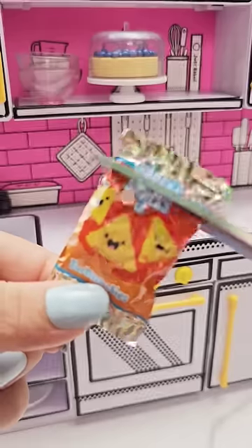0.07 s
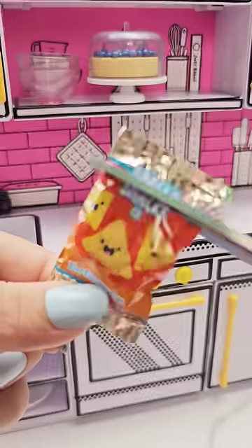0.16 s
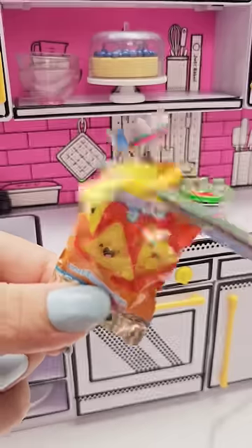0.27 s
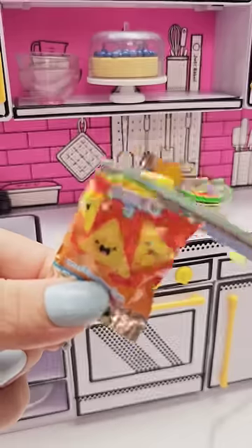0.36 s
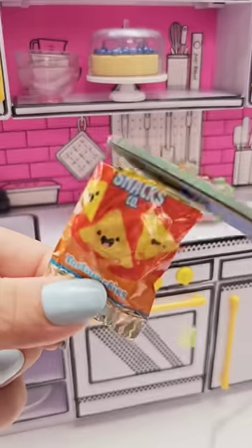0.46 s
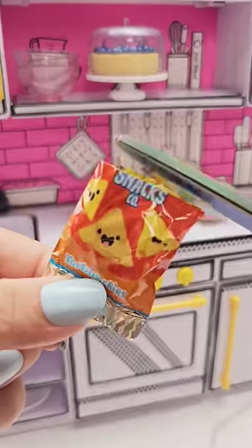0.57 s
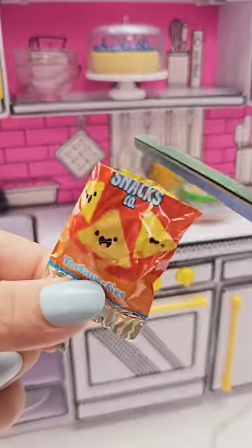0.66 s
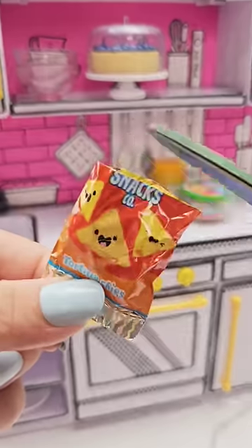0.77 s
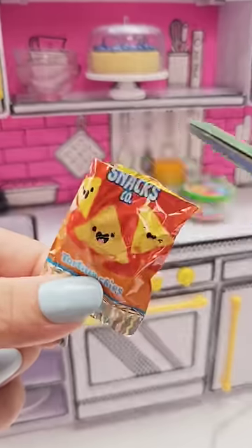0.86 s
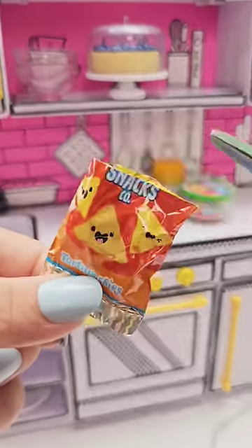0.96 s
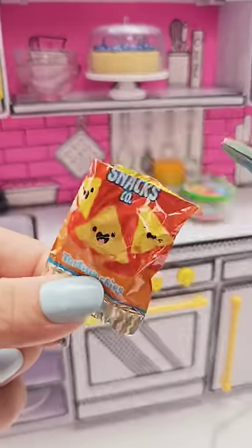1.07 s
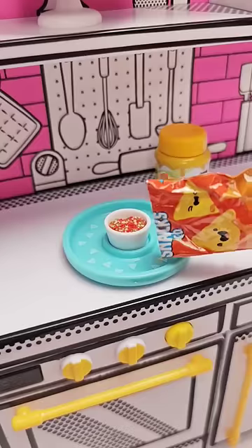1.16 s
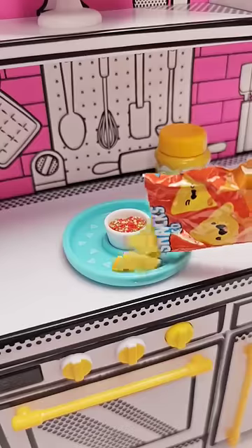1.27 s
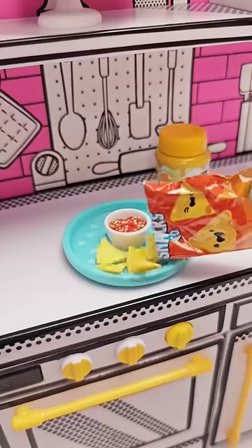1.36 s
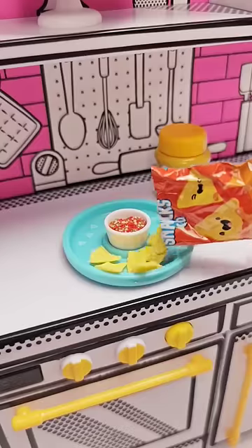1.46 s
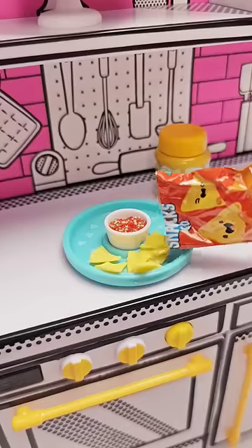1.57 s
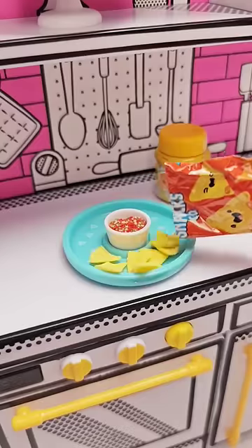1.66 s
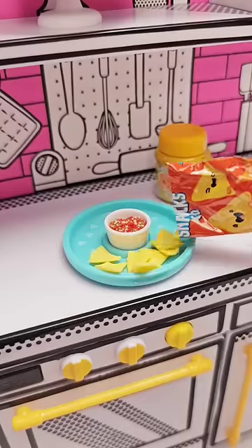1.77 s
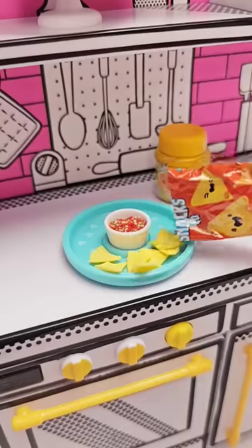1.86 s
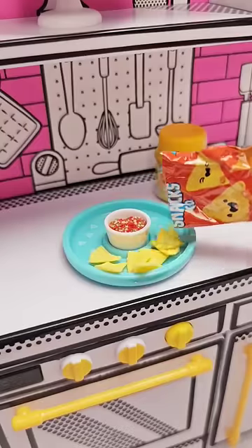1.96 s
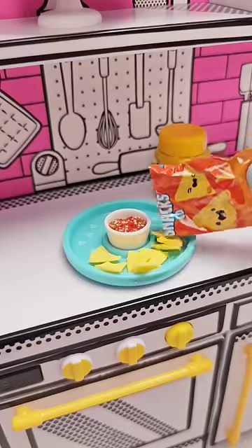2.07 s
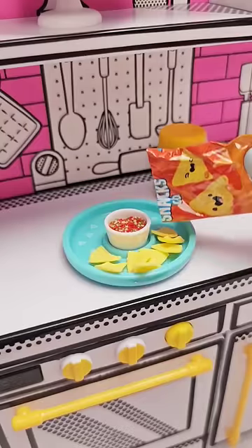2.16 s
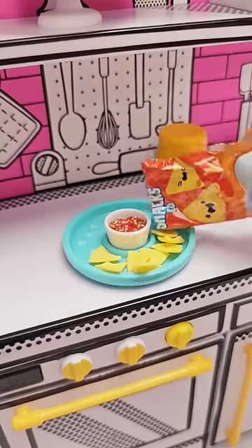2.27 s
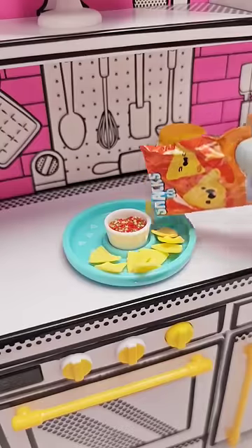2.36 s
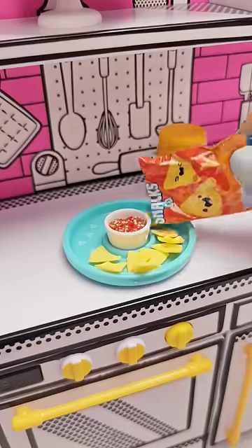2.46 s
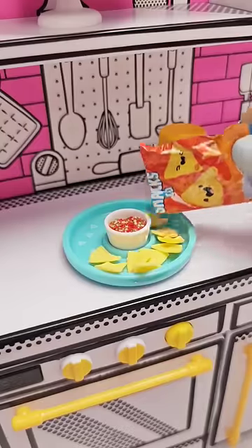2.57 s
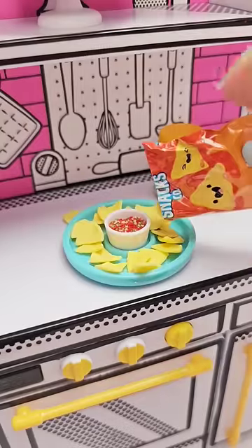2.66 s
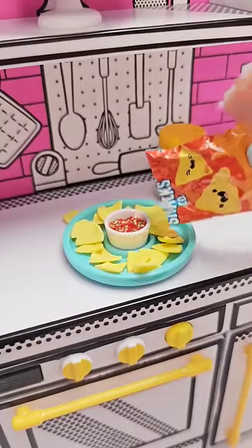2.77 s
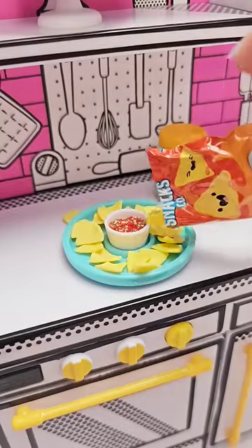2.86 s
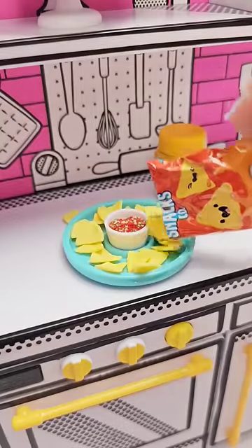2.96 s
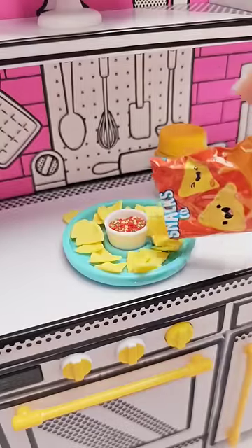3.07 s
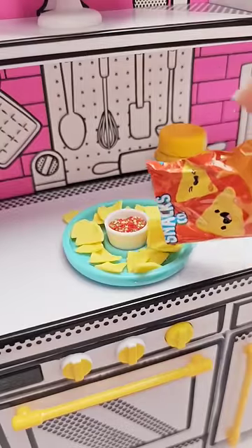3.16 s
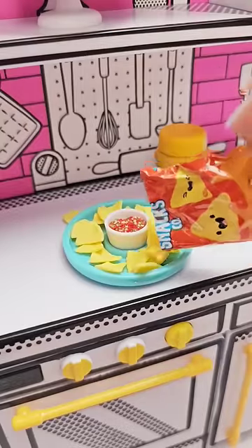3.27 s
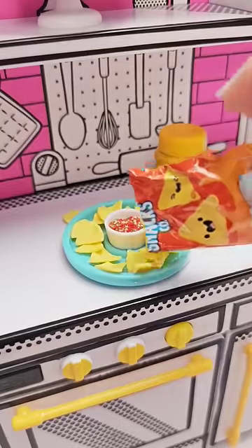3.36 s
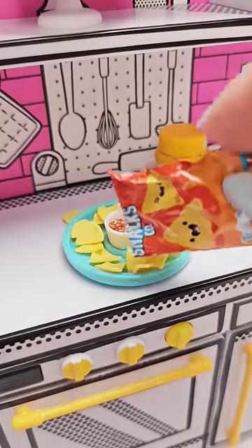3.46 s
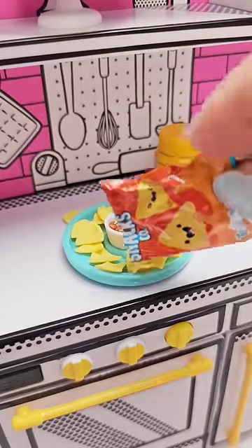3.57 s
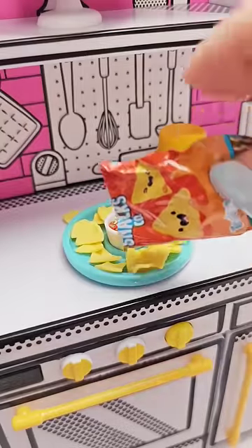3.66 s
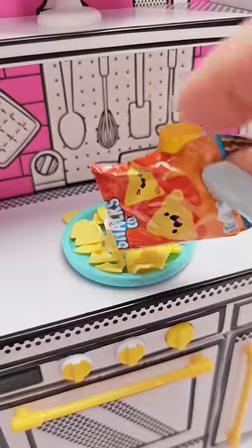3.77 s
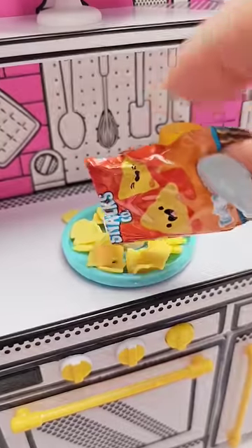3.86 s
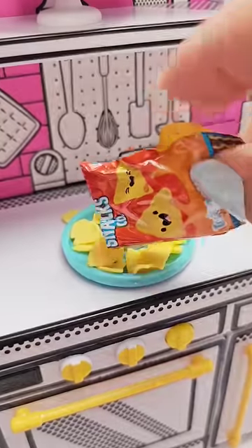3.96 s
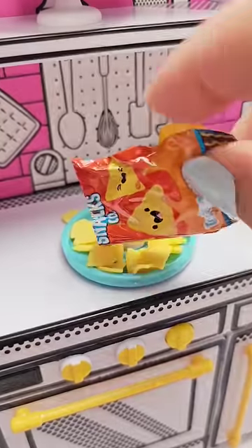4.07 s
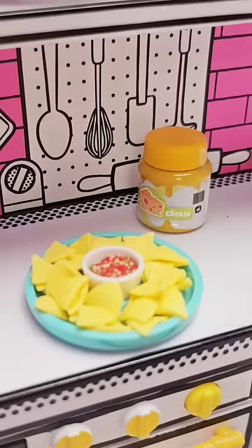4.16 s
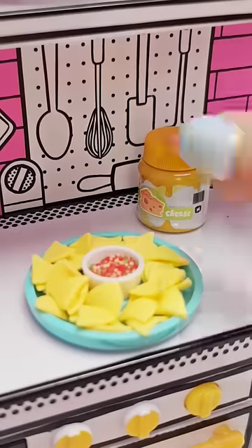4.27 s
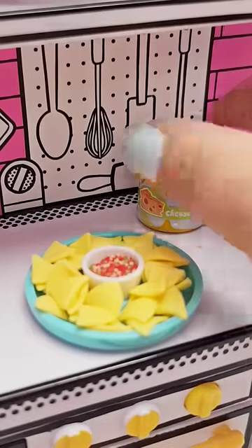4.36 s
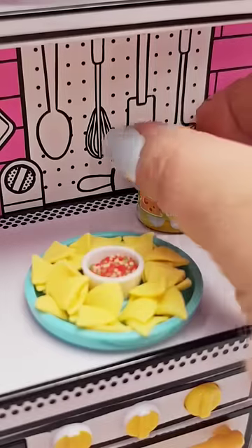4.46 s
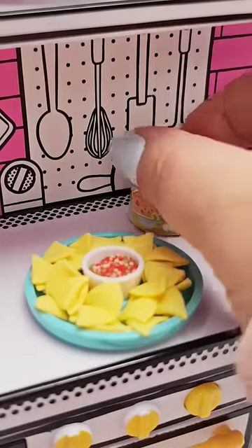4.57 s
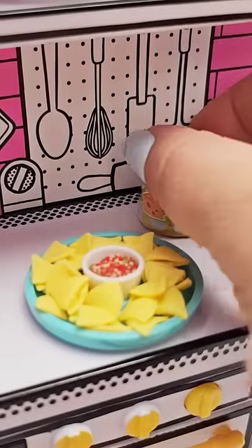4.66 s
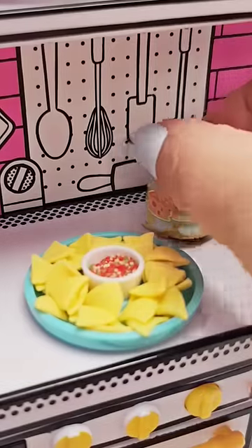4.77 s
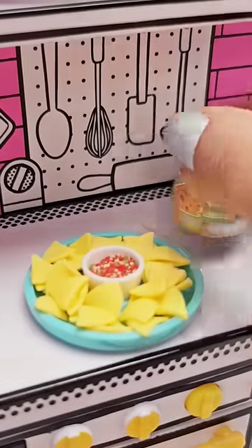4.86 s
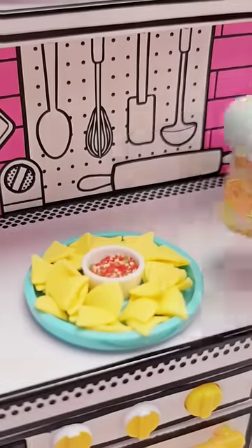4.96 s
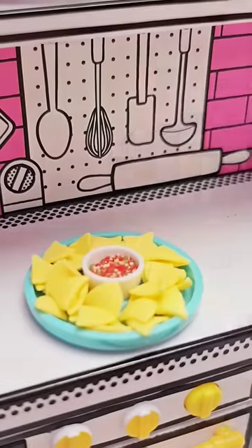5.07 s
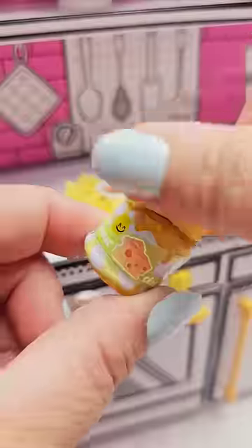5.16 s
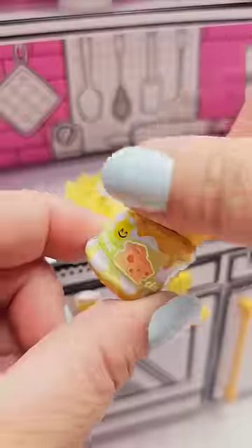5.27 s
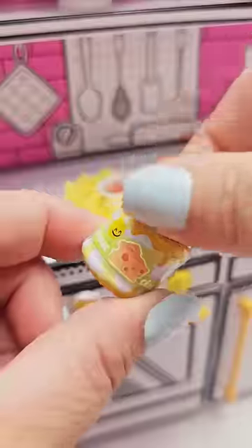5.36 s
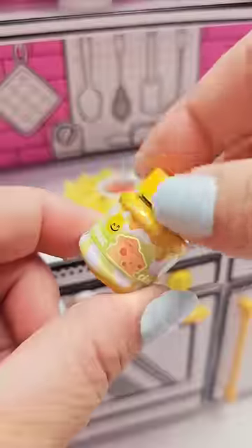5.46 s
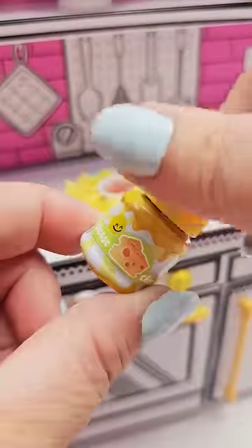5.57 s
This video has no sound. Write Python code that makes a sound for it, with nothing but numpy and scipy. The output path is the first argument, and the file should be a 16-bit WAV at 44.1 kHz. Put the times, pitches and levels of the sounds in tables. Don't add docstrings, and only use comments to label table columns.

```python
import sys
import numpy as np
from scipy import signal
from scipy.fft import rfft, irfft
from scipy.io import wavfile
from scipy.ndimage import uniform_filter1d, minimum_filter1d

SR = 44100
rng = np.random.default_rng(int(sys.argv[2]) if len(sys.argv) > 2 else 0)


def decibels_to_gain(level_db):
    exponent = np.asarray(level_db, float) / 20
    return 10 ** exponent


def wav_out(sig):
    wavfile.write(sys.argv[1], SR, np.round(np.clip(np.atleast_2d(sig).T, -1, 1) * 32767).astype(np.int16))


N = 246959


def unit(x):
    return x / np.sqrt(np.mean(x ** 2) + 1e-20)


def along(points, hz):
    point_hz, point_db = np.transpose(points)
    return np.interp(np.log(hz + 1), np.log(point_hz + 1), point_db)


def colour(x, gain):
    n = x.shape[-1]
    return unit(irfft(rfft(x) * gain(np.fft.rfftfreq(n, 1 / SR)), n))


def ports(n, alike):
    both, left, right = rng.standard_normal((3, n))
    alike = np.clip(alike, 0, 1)
    return np.sqrt(alike) * both + np.sqrt(1 - alike) * np.array([left, right])


def track(spans, column):
    t = np.arange(N) / SR
    gain = 0
    for rows in spans:
        rows = np.array(rows)
        gain = gain + decibels_to_gain(np.interp(t, rows[:, 0], rows[:, column], -200, -200))
    return gain


def grit(n, rate, spread_db, life):
    kicks = (rng.random(n) < rate / SR) * decibels_to_gain(spread_db * rng.exponential(size=n))
    decay = np.exp(-1 / (life * SR))
    return unit(signal.lfilter([1], [1, -decay], kicks) + 0.4)


def steady(noise, envelope):
    x = noise * envelope
    return x * np.sqrt(np.sum(envelope ** 2) / np.sum(x ** 2, axis=1, keepdims=True))


def add(out, start, x):
    out[:, round(start * SR):][:, :x.shape[1]] += x


def stiff(x):
    return signal.sosfilt(signal.butter(3, 190, "high", fs=SR, output="sos"), x)


def ringing(modes, start, attack):
    t = np.maximum(np.arange(N) / SR - start, 0)
    ring = 0
    for hz, db, t60 in modes:
        ring = ring + decibels_to_gain(db - 60 * t / t60) * np.sin(2 * np.pi * hz * t)
    return ring * (1 - np.exp(-t / attack))


# (frequency [Hz], density [dB per Hz])
ROOM_SPECTRUM = [(20, -13.5), (50, -18), (91, -12), (120, -3), (160, -9), (205, -14.5), (331, -20.5),
                 (450, -24), (900, -28.5), (2100, -34.5), (2600, -29.5), (4500, -33)]
# (frequency [Hz], density [dB per Hz])
MIC_HISS = [(6500, -45), (7500, -44), (10600, -64.5), (10900, -39.5), (15400, -47.5), (15700, -62.5)]
# (frequency [Hz], left-right likeness [0-1])
PORT_COHERENCE = [(60, 0.85), (130, 0.79), (290, 0.27), (640, 0.018)]
# (time [s], level [dB])
ROOM_LEVEL = [
    (0.0, -71.5),
    (4.18, -69),
    (5.6, -71.5),
]


def room():
    def level(f):
        return decibels_to_gain(along(ROOM_SPECTRUM + MIC_HISS, f))

    def split(f):
        angle = np.arccos(np.clip(along(PORT_COHERENCE, f), -1, 1)) / 2
        return np.array([np.cos(angle), np.sin(angle)])

    noise = rng.standard_normal((2, N))
    common, opposed = colour(noise, lambda f: level(f) * split(f))
    return decibels_to_gain(-1.0) * track([ROOM_LEVEL], column=1) * np.array([common + opposed, common - opposed])


# (frequency [Hz], level [dB], t60 [s])
JAR_MODES = [(279, -35, 0.093), (452, -32.5, 0.096), (510, -22, 0.0179), (1147, -36.5, 0.027)]
# (time [s], hiss [dB], rattle [dB])
JAR_SCRAPE = [
    (4.552, -88, -70),
    (4.575, -50.5, -61.5),
    (4.592, -57.5, -36.5),
    (4.604, -104, -53),
    (4.645, -77, -64),
    (4.68, -66.5, -52.5),
    (4.745, -85, -101),
]
# (time [s], hiss [dB])
LID_RUBS = [
    (5.35, -95),
    (5.381, -86.5),
    (5.425, -101),
    (5.468, -81),
    (5.49, -99),
]
# (frequency [Hz], density [dB per Hz])
SKIN_FRICTION = [(3000, -23), (8000, -2), (10500, -7), (13500, -1.5), (15500, -13), (16300, -40.5)]
# (frequency [Hz], density [dB per Hz])
TOP_RATTLE = [(180, -39), (300, -5), (500, 5), (750, -7.5), (1200, -18), (2000, -37.5)]


def jar():
    friction = colour(ports(N, 0.082), lambda f: decibels_to_gain(along(SKIN_FRICTION, f)))
    hiss = track([JAR_SCRAPE, LID_RUBS], column=1) * friction
    rattle = track([JAR_SCRAPE], column=2) * colour(ports(N, 1.0), lambda f: decibels_to_gain(along(TOP_RATTLE, f)))
    return hiss + rattle + stiff(ringing(JAR_MODES, start=4.5905, attack=0.0008))


# (time [s], pitch [Hz], level [dB], t60 [s])
HANDLE_KNOCKS = [
    (0.153, 310, -38, 0.022),
    (.211, 325, -55, 0.056),
    (.238, 258.8, -55.5, 0.069),
    (0.406, 298, -51.5, 0.092),
    (.211, 765, -49.5, 0.033),
    (.327, 786, -33.5, 0.036),
    (.374, 810, -60, .04),
    (.798, 484, -51, 0.027),
    (0.805, 419, -54, .03),
    (.818, 313, -53.5, 0.021),
]


def scissors():
    thump_modes = [(175.0, -38.5, 0.074), (470, -45, 0.06), (250, -50, 0.24), (69.0, -57.5, 0.23),
                   (794, -37.5, 0.04)]
    sound = ringing(thump_modes, start=0.2885, attack=0.00041)
    for s, hz, db, t60 in HANDLE_KNOCKS:
        sound = sound + ringing([(hz, db, t60)], start=s, attack=0.001)
    return sound


# (frequency [Hz], level [dB], t60 [s])
TOP_MODES = [(300.3, -10, 0.14), (416, -7, 0.064), (580, -4, 0.054), (762, -25.5, 0.28),
             (940, -11.5, 0.047)]
# (time [s], peak [dB], strongest frequency [Hz])
POURED_CHIPS = [(1.0621, -57, 531), (1.2179, -44.5, 770), (1.2459, -37, 620), (1.3044, -35, 603),
                (1.3146, -35.5, 500), (1.3234, -26, 665), (1.3516, -32.5, 573), (1.3664, -37, 604),
                (1.3827, -38, 640), (1.4458, -32.5, 362), (1.4721, -35, 357), (1.5431, -33, 618),
                (1.5879, -34.5, 643), (1.697, -32, 540), (1.7342, -41.5, 540), (1.7495, -40, 648),
                (1.646, -54.5, 580)]
# (time [s], peak [dB], strongest frequency [Hz])
LATE_CHIPS = [(1.872, -51.5, 640), (1.9072, -44, 536), (1.9211, -43, 720), (2.124, -30, 492),
              (2.17, -51, 560), (1.98, -58, 600), (2.02, -57.5, 520), (2.142, -37.5, 696),
              (2.2, -61.5, 540), (2.222, -55, 1010), (2.456, -47, 475), (2.3224, -32.5, 490),
              (2.396, -31, 370), (2.41, -36.5, 351), (2.4814, -33.5, 356), (2.5156, -34, 366),
              (2.6875, -31, 334), (2.8104, -34.5, 580), (2.92, -41, 548), (2.9371, -44, 452),
              (3.0487, -45, 536), (3.1862, -39, 548), (3.2108, -49, 470), (3.2465, -51, 614),
              (3.3496, -42, 470), (3.8496, -30.5, 365), (3.866, -35.5, 580), (3.8864, -35.5, 288)]


def knocks():
    out, t = np.zeros((2, N + SR)), np.arange(6000) / SR
    onset = 1 - np.exp(-t / 0.0007)
    jolts = [(s + delay_ms / 1000, knock_db, 676) for s, _, delay_ms, _, knock_db in FINGER_TAPS]
    for s, db, hz in POURED_CHIPS + LATE_CHIPS + jolts:
        luck = rng.standard_normal((len(TOP_MODES), 2))
        first_push = decibels_to_gain(-0.5 - 60 * t / 0.014)
        ring = np.sin(2 * np.pi * hz * t) * (decibels_to_gain(-60 * t / 0.048) + first_push)
        for (mode_hz, mode_db, t60), (level_luck, pitch_luck) in zip(TOP_MODES, luck):
            detune = 1 + 0.04 * pitch_luck
            decay = decibels_to_gain(mode_db + 3 * level_luck - 60 * t / t60)
            ring = ring + decay * np.sin(2 * np.pi * mode_hz * detune * t)
        add(out, s, decibels_to_gain(db - 8.5) * ring[None] * onset)
    return stiff(stiff(out[:, :N]))


# (time [s], crackle [dB])
FOIL_BENDING = [
    (.03, -61.5),
    (.16, -55),
    (.21, -70),
    (.255, -67),
    (.283, -36.5),
    (.42, -56.5),
    (.52, -56),
    (.65, -51),
    (.82, -66.5),
    (.85, -82),
]
# (time [s], length [s], crackle [dB], rattle of the top [dB])
CHIP_SLIDES = [(1.19, 0.26, -64.5, -56.5), (1.457, 0.065, -67.5, -76), (1.544, 0.012, -76, -61),
               (1.572, 0.078, -69.5, -60), (1.683, 0.074, -74, -59.5), (1.906, 0.022, -63, -59),
               (1.973, 0.016, -66.5, -70), (2.116, 0.029, -63.5, -51.5), (2.317, 0.25, -75, -61.5),
               (2.71, 0.025, -61.5, -82), (2.808, 0.035, -58, -51), (2.994, 0.14, -79, -65),
               (3.171, 0.034, -65, -55.5), (3.326, 0.026, -66, -66), (2.86, 0.013, -74.5, -68.5),
               (3.097, 0.055, -84.5, -82), (3.523, .05, -82, -90), (4.19, 0.22, -84.5, -94.5),
               (2.174, 0.023, -83.5, -82.5), (3.796, .18, -81, -64.5)]


def handling():
    s, length, crackle_db, rattle_db = np.transpose(CHIP_SLIDES)[:, :, None]
    start_db_per_s, stop_db_per_s = 906, 270
    t = np.arange(0, N / SR, 0.002)
    fade_db = -start_db_per_s * np.maximum(s - t, 0) - stop_db_per_s * np.maximum(t - s - length, 0)
    sample_t = np.arange(N) / SR
    crackle = np.interp(sample_t, t, decibels_to_gain(crackle_db + fade_db).sum(axis=0))
    rattle = np.interp(sample_t, t, decibels_to_gain(rattle_db + fade_db).sum(axis=0))
    bent = track([FOIL_BENDING], column=1)
    hand = decibels_to_gain(-68) * (bent / decibels_to_gain(-57)) ** 0.58
    return crackle + bent, rattle + hand


# (frequency [Hz], density [dB per Hz])
SLOW_CRACKLE = [(1300, -19.5), (2300, -5.5), (3500, -6), (5300, -2.5), (7500, -5.5), (10100, -11),
                (14500, -9), (16000, -27)]
# (frequency [Hz], density [dB per Hz])
CHIP_FRICTION = [(1500, -8.5), (3300, -1), (5500, -10.5), (8500, -8), (10300, -54), (13000, -8),
                 (16000, -55)]


def rustle():
    cutting = np.arange(N) < 1.0 * SR
    cut_creaks = grit(N, rate=1100, spread_db=3, life=0.0012)
    pour_creaks = grit(N, rate=1400, spread_db=2.5, life=0.001)
    creaks = np.where(cutting, cut_creaks, pour_creaks)
    blades = colour(ports(N, 0.18), lambda f: decibels_to_gain(along(SLOW_CRACKLE, f)))
    pouring = colour(ports(N, 0.44), lambda f: decibels_to_gain(along(CHIP_FRICTION, f)))
    air = colour(ports(N, 0.93), lambda f: decibels_to_gain(along(BAG_AIR, f)))
    crackle = creaks * (np.where(cutting, blades, pouring) + decibels_to_gain(-15) * air)
    bumps = grit(N, rate=110, spread_db=3, life=0.005)
    rattle = bumps * colour(ports(N, 1.0), lambda f: decibels_to_gain(along(TOP_RATTLE, f)))
    crackle_gain, rattle_gain = handling()
    return decibels_to_gain(0.5) * crackle_gain * crackle + rattle_gain * rattle


# (frequency [Hz], density [dB per Hz])
BAG_AIR = [(300, -29), (600, -4.5), (1000, 0.5), (1600, -2), (2600, -34.5)]


def pops(rows, sheet, ring_db, trim_db, low_db, after_db, after_t60, rise_db, fall_db, gritty, ring_gain_db=2):
    out, t = np.zeros((2, N + SR)), np.arange(4096) / SR - 0.02
    for s, db, hz, rel_db, width, *pan_db in rows:
        ripple = rng.standard_normal(60)

        def crease_gain(f):
            uneven_db = 4 * np.interp(f / 450, np.arange(len(ripple)), ripple)
            resonance = 1 + decibels_to_gain(ring_db) / (1 + ((f - hz) / (0.063 * hz)) ** 2)
            return decibels_to_gain(along(sheet, f) + uneven_db) * resonance

        creaks = grit(len(t), rate=1800, spread_db=3, life=0.0006)
        burst = decibels_to_gain(np.where(t < 0, rise_db * t / width, -fall_db * np.abs(t / width) ** 0.85))
        after = decibels_to_gain(after_db - 60 * t / after_t60) * (t > 0) * np.cos(np.pi / 2 * t / t[-1])
        modes_hz = np.append(hz, rng.uniform(4000, 14000, 2))[:, None]
        mode_decay = decibels_to_gain(-np.abs(t) * modes_hz * np.where(t < 0, 6, 2.2))
        click = np.sin(2 * np.pi * modes_hz * t) * mode_decay
        click = (click * [[1.3], [0.6], [0.6]]).sum(axis=0) / (1 + (width / 0.003) ** 4)
        click = decibels_to_gain(ring_gain_db) * click
        sheet_noise = colour(ports(len(t), 0.15), crease_gain)
        roughness = creaks ** (gritty * min(width / 0.0024, 1))
        high = steady(sheet_noise * roughness, burst) + sheet_noise * after * creaks + click
        low = steady(colour(ports(len(t), 0.9), lambda f: decibels_to_gain(along(BAG_AIR, f))), burst + after)
        side = decibels_to_gain(np.sum(pan_db) * np.array([[0.5], [-0.5]]))
        add(out, s + t[0], decibels_to_gain(db + trim_db) * side * (high + decibels_to_gain(rel_db + low_db) * low))
    return out[:, :N]


# (time of touch [s], touch [dB], delay until the bag gives [ms], jolt [dB], knock below [dB])
FINGER_TAPS = [
    (2.6876, -40.5, 9.9, -40, -55),
    (2.8307, -30.5, 19, -30, -40),
    (2.9978, -36, 16, -30.5, -38),
    (3.1579, -41, 14.6, -34.5, -36.5),
    (3.3183, -43, 10.4, -45, -43.5),
    (3.4715, -42.5, 13.7, -38.5, -39.5),
    (3.6065, -43.5, 15.2, -39.5, -54.5),
    (3.7785, -44.5, 15, -34, -54.5),
    (3.9526, -36.5, 15.4, -32.5, -43),
    (4.1507, -43.5, 13, -40, -48),
]
# (frequency [Hz], density [dB per Hz])
TAPPED_SIDE = [(1060, -60), (1800, -26), (3050, -1), (4870, -8), (8320, -9), (12800, -15.5), (15300, -19),
               (16300, -27)]
# (frequency [Hz], density [dB per Hz])
BAG_FOIL = [(1060, -59), (1800, -14), (3050, -8), (4870, -10), (8320, -8), (12800, -12), (14200, -15.5),
            (15300, -10), (16300, -28)]


def taps():
    touch_hz, touch_low_db, touch_s = 3030, -18, 1.65 / 1000
    jolt_hz, jolt_low_db, jolt_s = 3070, 4.5, 8.7 / 1000
    settle_s, settle_db = 31 / 1000, -18.5
    touches, jolts = [], []
    for s, touch_db, delay_ms, jolt_db, _ in FINGER_TAPS:
        jolt = s + delay_ms / 1000
        touches.append((s, touch_db, touch_hz, touch_low_db, touch_s))
        jolts.append((jolt, jolt_db, jolt_hz, jolt_low_db, jolt_s))
        jolts.append((jolt + settle_s, jolt_db + settle_db, jolt_hz, jolt_low_db, jolt_s / 2))
    thin = pops(touches, BAG_FOIL, ring_db=3.0, trim_db=-7.5, low_db=-4.0, after_db=-22.5, after_t60=0.11,
                rise_db=36, fall_db=5.5, gritty=0.94)
    wide = pops(jolts, TAPPED_SIDE, ring_db=-10, trim_db=-8.5, low_db=-9.5, after_db=-24, after_t60=0.091,
                rise_db=11, fall_db=8.5, gritty=1.0)
    return thin + wide


def creases(rows, low_db, low_per_db, low_per_octave):
    out = []
    for s, db, hz, ms, *pan_db in rows:
        air_db = low_db - low_per_db * (db + 30) + low_per_octave * np.log2(ms / 4)
        out.append((s, db, hz, air_db, ms / 1000, *pan_db))
    return out


# (frequency [Hz], density [dB per Hz])
CUT_FOIL = [(1300, -17.5), (2300, -9), (3500, -7), (5300, -5), (7500, -4.5), (10100, -9.5), (14500, -8),
            (16000, -23.5)]
# (time [s], peak [dB], ring [Hz], width [ms], left-right [dB])
FIRST_BITE_POPS = [(0.0318, -49, 4470, 10, -1.5), (0.054, -27, 3462, 2, -3), (0.0603, -12, 4450, 2.4, 1.3),
                   (0.0632, -26, 4590, 4.4, 0), (.051, -26.5, 4000, 2.3, -1.5),
                   (0.0892, -34, 4855, 4.5, -13), (0.104, -6.5, 9144, 0.47, 5.5),
                   (0.1068, -24.5, 4766, 15, -3.5), (0.1146, -19, 5713, 1.6, 8),
                   (0.122, -26.5, 4163, 5.6, 3.5), (.1285, -25.5, 4524, 8.2, 0),
                   (0.1374, -28, 3527, 0.88, 6), (0.149, -20.5, 11100, 6.3, -1),
                   (0.1554, -26.5, 3710, 2.5, 1.5), (0.1715, -24.5, 13300, 1.7, 5.5),
                   (0.1811, -24, 9450, 1.4, -6.5), (0.1903, -44.5, 7220, 2.2, -8),
                   (0.2141, -41, 4810, 2.1, 6.5)]
# (time [s], peak [dB], ring [Hz], width [ms], left-right [dB])
SECOND_BITE_POPS = [(0.2892, -5.5, 5147, 1.06, -1), (0.2921, -4.5, 7110, 2.14, -4.5),
                    (0.296, -27, 6827, 16, 1), (.31, -27.5, 5992, 10, -1), (0.3249, -23.5, 7060, 9.4, 3.5),
                    (0.3335, -26.5, 6910, 15.6, 1.5), (0.3388, -27.5, 13030, 3.3, 2.5),
                    (0.3611, -22.5, 12070, 4.3, 7.5), (0.3748, -28, 3153, 7.5, 1.56),
                    (0.3845, -37.5, 3526, 11, -2), (0.4006, -36.5, 5100, 8.7, 5.5),
                    (0.4135, -35.5, 5900, 1.3, -8), (0.427, -40, 5700, 1.9, -3.5)]
# (time [s], peak [dB], ring [Hz], width [ms], left-right [dB])
SPRING_POPS = [(.4895, -26.5, 7100, 2.3, -3), (.4935, -42, 6400, 2.7, 2), (.5392, -24, 7400, 2.2, -1),
               (.5420, -23, 9500, 2.8, -6), (.5455, -30.5, 5150, 3.6, 4), (.5566, -23.5, 5430, 3.9, -1),
               (.56, -39, 4900, 9.1, -3), (.578, -41, 5730, 2.3, 0), (.6228, -26, 7000, 1.4, -11),
               (.6255, -24, 2980, 3.5, 4), (.646, -37, 5650, 4.1, -8), (.6525, -37, 3200, 3, 5),
               (.6755, -34.5, 6200, 2.5, -6), (.7098, -40, 7260, 2.1, -6), (.7171, -40, 6160, 2, -1),
               (.7335, -38, 3020, 1.6, -4), (.7368, -21, 5320, 0.93, -3), (.7395, -26, 5500, 4.1, -6),
               (.7715, -45, 8240, 2.7, -2.5), (.7883, -50, 3180, 3.4, -5.5), (.8076, -51, 3150, 2.9, -5.5),
               (.8146, -50.5, 7440, 2.9, -4), (.8271, -60, 3140, 3.2, -9)]
# (time [s], peak [dB], ring [Hz], width [ms])
SHAKE_TICKS = [(1.2169, -42.5, 5780, 11), (1.251, -43, 3120, 6.8), (1.2626, -45.5, 3870, 35),
               (1.285, -36.5, 6230, 5.6), (1.3257, -37, 2550, 12.7), (1.3662, -32, 9900, 3.4),
               (1.3868, -67, 9300, 3.8), (1.4278, -36, 2660, 1.4), (1.4451, -27, 11400, 1.8),
               (1.4782, -43.5, 7600, 4.9), (1.5442, -38.5, 14300, 4.1), (1.5888, -42, 5900, 5.1),
               (1.7003, -40.5, 12800, 3.6), (1.7569, -41.5, 3290, 3.7), (1.9039, -39.5, 7020, 1.7),
               (2.3724, -38, 6800, 4.1), (2.3959, -32, 7600, 1.6), (2.4097, -41, 6640, 6.6),
               (2.4806, -48, 7850, 1.6), (2.5254, -40, 8740, 4.1), (2.7838, -47, 3620, 16),
               (2.8019, -37, 7300, 1.9), (3.05, -46.5, 3300, 8), (3.1768, -43, 3234, 3.6),
               (3.5391, -47, 2710, 0.65), (3.8452, -48, 3030, 11), (3.868, -42.5, 6230, 5),
               (3.8833, -41, 6940, 1.93), (4.5765, -49.5, 13430, 1.6), (4.7055, -55.5, 11900, 3.9)]
# (time [s], peak [dB], ring [Hz], width [ms])
STRAY_TICKS = [(1.1844, -54, 3240, 2.5), (1.2234, -45.5, 2990, 2.7), (1.304, -44, 3900, 2.6),
               (1.3523, -45, 9300, 2.9), (1.4726, -42, 8050, 1.8), (1.493, -45.5, 3190, 4.9),
               (1.7407, -52, 3050, 2.8), (1.8666, -57, 7540, 2.5), (1.9235, -54, 2530, 2.5),
               (1.948, -55, 3880, 2.5), (1.9844, -58, 2990, 3.1), (1.9978, -50, 5400, 2.7),
               (2.1046, -49.5, 3750, 1.7), (2.7544, -49, 3210, 3.3), (2.9217, -63.5, 2510, 3.4),
               (3.0946, -56, 2970, 2), (3.129, -60.5, 3060, 2.7), (3.2292, -51, 2990, 2.5),
               (3.507, -51, 3320, 2), (3.8144, -43.5, 4130, 3.8), (3.8274, -49, 3200, 2.8),
               (3.9358, -53, 3400, 2.3), (4.0004, -52, 3160, 2.3)]
# (time [s], peak [dB], ring [Hz], width [ms])
WRIST_FLICKS = [
    (2.1185, -36, 3460, 1.6),
    (2.1242, -38, 3140, 2.4),
    (2.1424, -45, 3920, 3.7),
    (2.3225, -37, 3300, 1.9),
    (2.3363, -32, 3530, 3.26),
    (2.5158, -42.5, 6930, 1.9),
]


def foil():
    cut = (creases(FIRST_BITE_POPS, low_db=-17, low_per_db=0.38, low_per_octave=1.6)
           + creases(SECOND_BITE_POPS, low_db=-10.5, low_per_db=0.33, low_per_octave=0.073)
           + creases(SPRING_POPS, low_db=-12.5, low_per_db=0.5, low_per_octave=0.86))
    shaken = (creases(SHAKE_TICKS, low_db=-11.0, low_per_db=0.0566, low_per_octave=3.6)
              + creases(STRAY_TICKS, low_db=-16, low_per_db=0.16, low_per_octave=1.5)
              + creases(WRIST_FLICKS, low_db=-5.0, low_per_db=0.06, low_per_octave=2.8))
    cut_pops = pops(cut, CUT_FOIL, ring_db=1.5, trim_db=-4.0, low_db=-0.07, after_db=-26.5, after_t60=0.13,
                    rise_db=27.5, fall_db=11, gritty=0.6, ring_gain_db=-1)
    shaken_pops = pops(shaken, BAG_FOIL, ring_db=8.0, trim_db=-7.0, low_db=-2.0, after_db=-22.0,
                       after_t60=0.24, rise_db=16, fall_db=8.5, gritty=0.5)
    before_jar = np.arange(N) < (JOINTS[2][0] + JOINT_FADE_S) * SR
    return cut_pops + shaken_pops + taps() * before_jar


# (time [s], length [s])
JOINTS = [
    (1.1805, .0065),
    (1.191, 0.0033),
    (4.176, 0.0093),
    (5.207, 0.0064),
]
JOINT_FADE_S = 0.0018


def joints():
    t = np.arange(N) / SR
    dip_db = 0
    for s, length in JOINTS:
        inside = np.minimum(t - s, s + length - t)
        dip_db = dip_db - 22 * np.clip(inside / JOINT_FADE_S + 0.5, 0, 1)
    return decibels_to_gain(dip_db)


def treble_gaps(x):
    hz, _, z = signal.stft(x, SR, nperseg=256)
    power = uniform_filter1d(np.mean(np.abs(z) ** 2, 0), size=7, axis=0)
    band_db = 10 * np.log10(np.abs(power) + 1e-16)
    snap_db = -minimum_filter1d(-band_db, size=15, axis=1)
    luck = np.kron(rng.standard_normal((26, z.shape[2] // 2 + 1)), np.ones((5, 2)))
    luck = luck[:len(hz), :z.shape[2]]
    margin_db = uniform_filter1d(band_db, size=2, axis=1) - snap_db + 25
    loss = 1 / (1 + np.exp(np.clip(margin_db / 1.5, -30, 30)))
    keep = 1 - (luck < -0.45) * (margin_db > -14) * loss
    treble = hz[:, None] > 2500
    return signal.istft(z * np.where(treble, keep, 1), SR, nperseg=256)[1][:, :N]


# (frequency [Hz], left-right [dB])
PORT_COLOUR = [(700, -0.4), (1300, 6), (2500, 6.5), (5000, -1), (8500, -1), (13000, 1.5)]


def scene():
    moving = np.abs(np.arange(N) / SR - (JOINTS[0][0] - 0.05)) > 0.05
    near = stiff(foil()) + rustle() * moving + knocks() + jar() + scissors()
    padded = N + 801
    hz = np.fft.rfftfreq(padded, 1 / SR)
    lag = 10
    tilt = decibels_to_gain(along(PORT_COLOUR, hz) / 2) * np.exp(1j * np.pi * hz * lag / SR)
    notch = decibels_to_gain(-7.5 / (1 + ((hz - 10100) / 260) ** 2))
    cutting = np.arange(N) < JOINTS[0][0] * SR
    spectrum = rfft(near * cutting, padded) + notch * rfft(near * ~cutting, padded)
    return irfft(spectrum * [tilt, 1 / tilt], padded)[:, :N] + room()


def roll_off(x):
    return signal.sosfilt(signal.butter(12, 16470, fs=SR, output="sos"), x)


def record(dry):
    clipped = np.clip(treble_gaps(dry) * joints(), -0.97, 0.97)
    limit = signal.butter(12, 15950, fs=SR, output="sos")
    mix = signal.sosfiltfilt(limit, clipped)
    return roll_off(mix)


dry = scene()
out = record(dry)
wav_out(out)
```